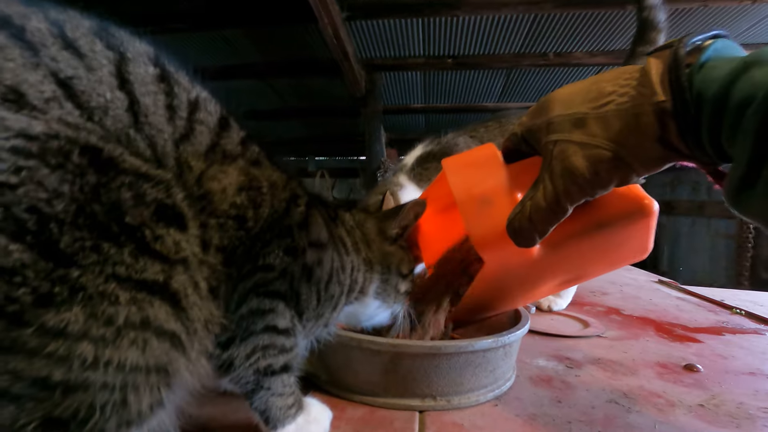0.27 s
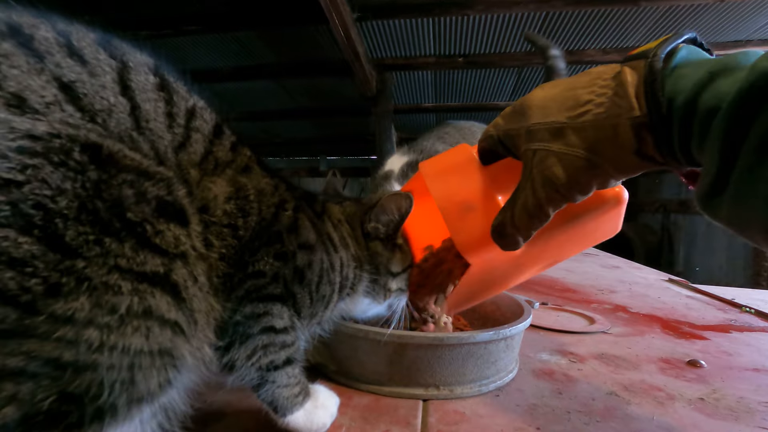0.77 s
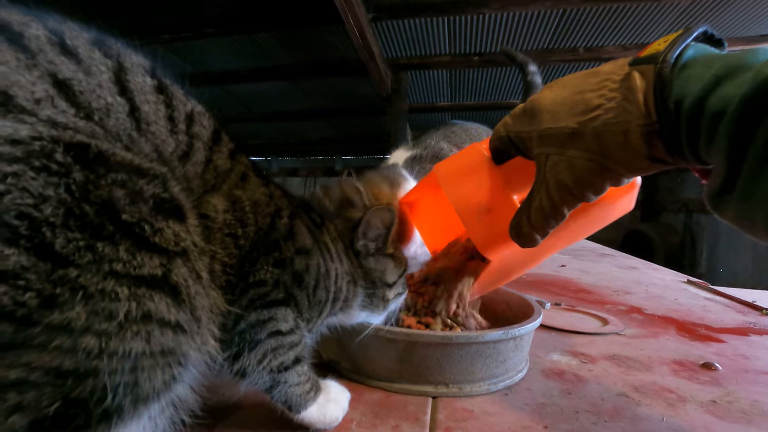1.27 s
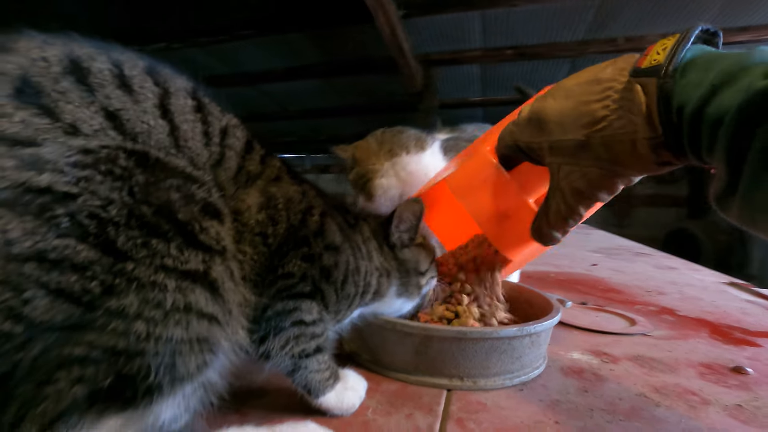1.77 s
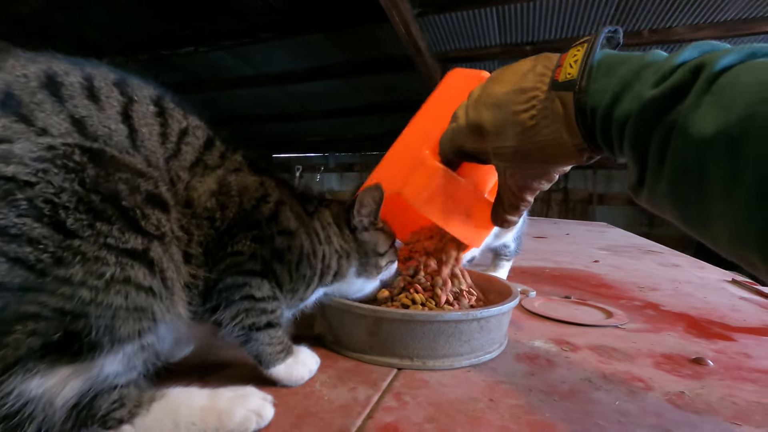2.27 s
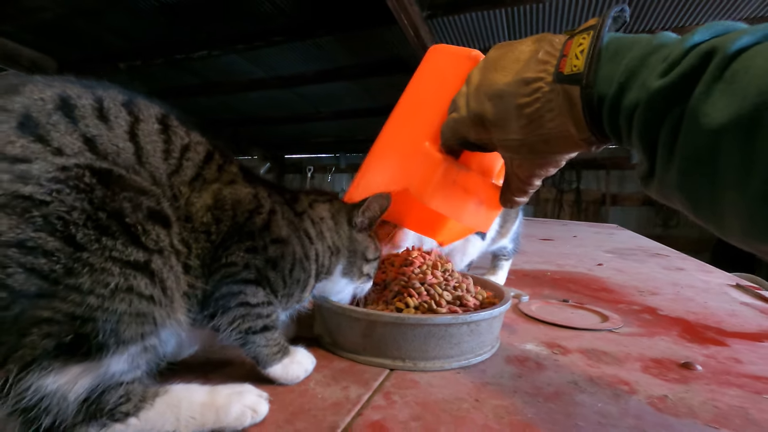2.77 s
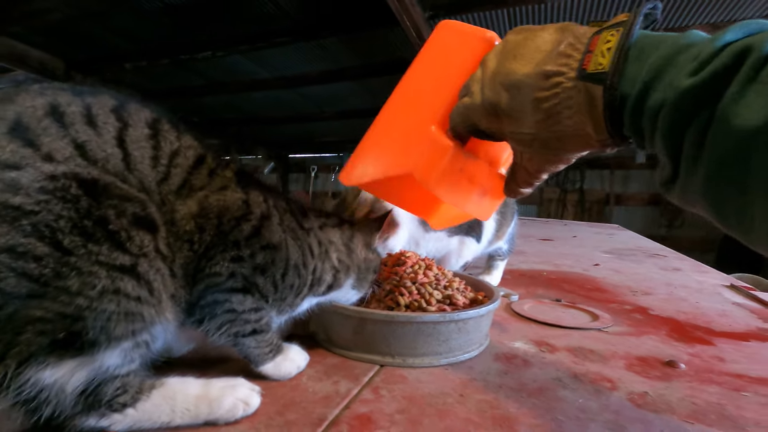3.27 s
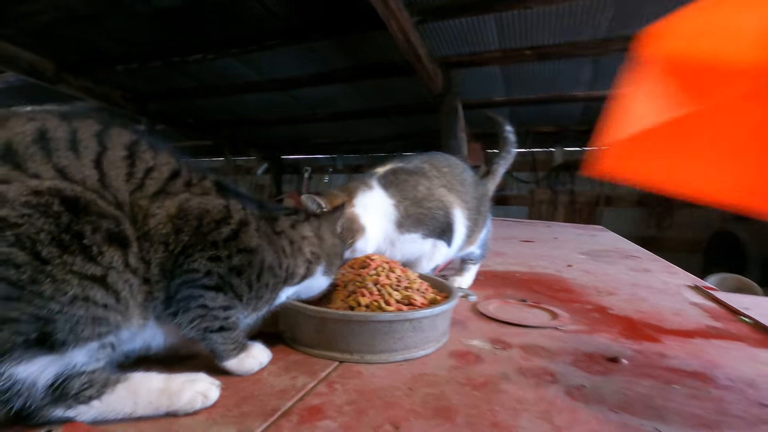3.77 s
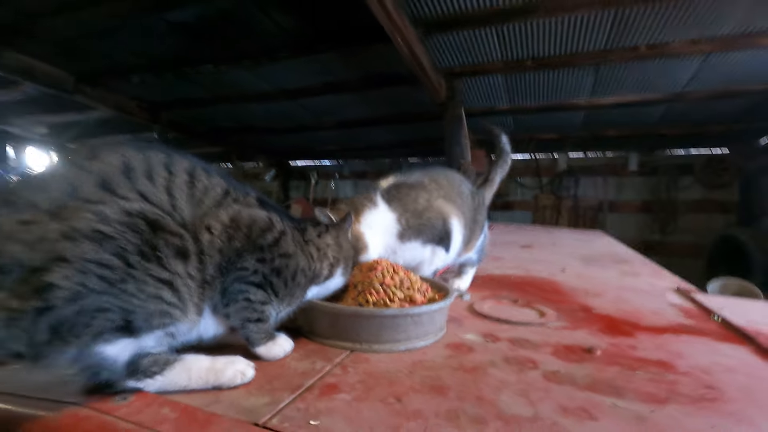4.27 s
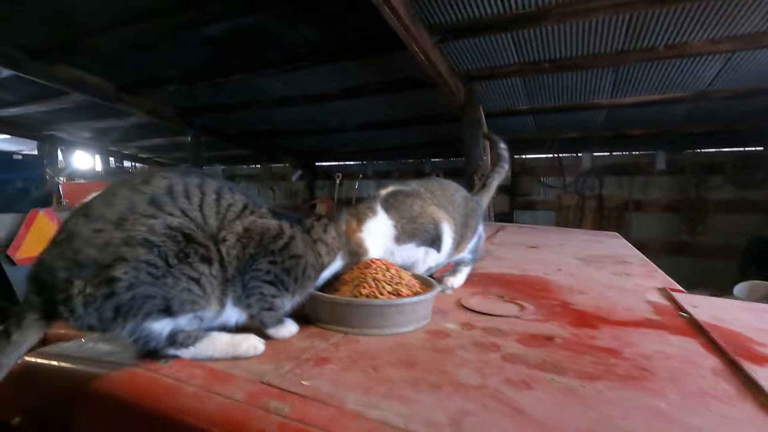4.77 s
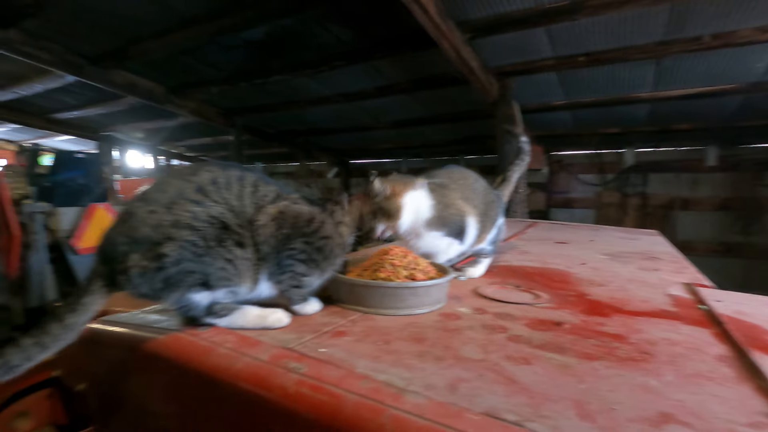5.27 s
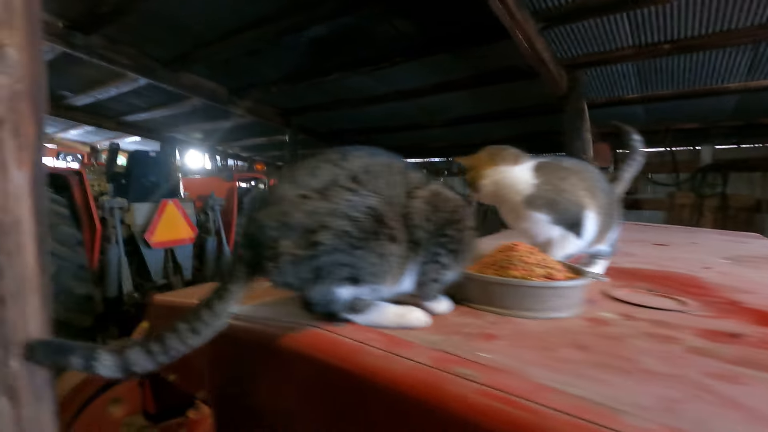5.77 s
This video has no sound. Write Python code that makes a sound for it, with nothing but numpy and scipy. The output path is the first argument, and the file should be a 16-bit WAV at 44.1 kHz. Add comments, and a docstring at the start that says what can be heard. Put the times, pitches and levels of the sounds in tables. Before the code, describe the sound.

Kibble pours in shaken surges into a ringing metal bowl for three seconds, then close cloth rustle and faint chewing ticks above a deep steady drone.

```python
"""In a barn with a low steady hum, dry cat food is shaken from a plastic scoop into a metal pan.
Crowds of tiny cracks make the kibble, which slides out in surges and drums on a deepening heap.
Single pieces ping resonances of the pan, whose modes change as it fills; others clack dryly.
Then a work jacket rustles close by in coloured slips and sliding resonances, and two cats nose and
crunch the food in soft knocks and ticks. Both ears get direct sound, reflections and the barn's air."""
import sys
import numpy as np
from scipy import signal
from scipy.fft import rfft, irfft, next_fast_len
from scipy.io import wavfile
from scipy.ndimage import map_coordinates

SR = 44100
rng = np.random.default_rng(int(sys.argv[2]) if len(sys.argv) > 2 else 0)


def generate_wav(signal):
    """Clip the signal to [-1, 1] and save it as 16-bit WAV at the path in sys.argv[1]."""
    frames = np.transpose(np.atleast_2d(signal))
    scaled = np.clip(frames, -1, 1) * 32767
    pcm = np.round(scaled).astype(np.int16)
    wavfile.write(sys.argv[1], SR, pcm)


N = 265658
TIME = np.arange(N) / SR

# All table levels are relative: the mix sets the final loudness.
# The steady stream out of the scoop: (time [s], rattle level [dB])
STREAM = [(0, -36.5), (.2, -36.5), (.55, -34), (.85, -39.5), (1.2, -40), (1.42, -48.5), (1.75, -41.5),
          (2.2, -41.5), (2.65, -40), (2.97, -53.5), (3.05, -63.5)]
# Surges let go by each shake of the scoop: (time of height [s], length [s], rattle level [dB])
SURGES = [(1.047, 0.047, -30), (1.096, 0.047, -31), (1.31, 0.068, -34.5), (1.47, 0.058, -42),
          (1.64, 0.062, -32.5), (1.802, 0.067, -32.5), (1.955, 0.055, -34), (2.06, 0.073, -37.5),
          (2.24, 0.037, -37.5), (2.395, 0.082, -32.5), (2.53, 0.094, -33), (2.69, 0.062, -35.5),
          (2.822, 0.043, -32), (2.937, 0.044, -39)]
# The heap drums more and deeper as it grows: (time [s], drumming level [dB], pitch [Hz])
HEAP = [(0, -15, 690), (.35, -5, 577), (1.1, 2, 516), (1.7, 0.5, 470), (2.35, 1.5, 470), (2.55, 2.5, 434),
        (2.85, 3, 476)]
# Hollow resonances under the falling kibble: (frequency [Hz], width [Hz], level [dB])
HOLLOW = [(298, 91, 0), (386.5, 28.4, 6), (446, 28, -6.5), (535, 17, 1.5), (612, 31, 1), (779, 15, -3.5)]
# Spectrum of the rattling kibble: (frequency [Hz], level [dB per Hz])
RATTLE = [(130, -1), (230, 4), (400, 0), (1050, -3), (1650, -7.5), (2500, -10.5), (3700, -11.5),
          (4700, -14), (6500, -24.5), (8500, -30), (12000, -33.5), (14500, -59)]
# Covered share of the pan's floor: (time [s], share [0-1])
COVERED = [(0, 0), (.8, .15), (1.35, .7), (1.6, 1)]
# Pieces that hit the pan: (time [s], ring level [dB], bright edge level [dB], favoured mode [Hz])
PINGS = [(.0024, -17.5, -23.5, 2130), (.059, -14.5, -32, 2175), (.065, -14.5, -21.5, 5600),
         (.093, -24, -32, 6600), (0.147, -25, -31, 5610), (0.199, -21, -35, 6440), (.2988, -23, -33, 6440),
         (.374, -13.5, -22, 8365), (.4383, -20.5, -28, 6440), (.509, -23.5, -27, 3170),
         (.571, -25, -33, 6440), (.652, -30, -28, 6440), (.8017, -20, -25.5, 7770),
         (1.1334, -27, -30, 11190), (1.208, -21.5, -27.5, 9410), (1.2333, -18, -29, 10010),
         (1.636, -19, -23, 7562), (1.7066, -29.5, -28.5, 7562), (1.9792, -28, -25.5, 9410),
         (2.07, -29, -32, 9410), (2.124, -43, -38, 9410), (2.257, -27, -33, 6540), (2.3208, -26, -34, 9410),
         (2.7896, -28, -30, 2200), (2.811, -23, -25.5, 5235), (2.8636, -26, -33, 5235),
         (2.898, -27.5, -30, 4160), (2.9504, -29, -35, 5235), (2.9779, -24.5, -47, 3125),
         (2.9867, -32, -37, 4200), (3.116, -35.5, -60, 1350), (3.163, -28, -44, 3840),
         (3.433, -29, -35.5, 3125)]
# Modes of the bare pan: (frequency [Hz], level [dB])
BARE_PAN = [(1020, 2), (2066, -3), (2183, -4), (3170, -5), (3810, -9), (4700, -5), (4800, -10), (5080, -12),
            (5610, -9.5), (6440, -5.5), (6600, -7), (7050, -8.5), (7420, -8), (7750, -3), (8170, -16),
            (8365, -5), (8660, -11), (9550, -13), (9800, -9), (10010, -11), (10130, -10), (10445, -5.5),
            (10950, -12), (11190, -8.5), (11530, -9.5), (12490, -12), (12830, -12)]
# Modes of the pan covered with kibble: (frequency [Hz], level [dB])
FULL_PAN = [(1350, 1), (1580, -2), (2105, -2), (2200, -0.5), (3125, 2), (3840, -9), (4160, -3.5),
            (5235, -4), (5970, -7), (6540, -6.5), (6890, -8), (7562, -8.5), (7750, -13), (9230, -16),
            (9410, -10), (10130, -12), (11020, -14), (11530, -11.5), (12470, -15)]
# Dry clacks of single pieces on the heap and the scoop: (time [s], peak level [dB], pitch [Hz])
CLACKS = [(.0443, -23, 2190), (.091, -21, 1300), (.2369, -25, 5110), (.273, -21.5, 626), (.3267, -23, 3230),
          (.3551, -20, 1500), (.4174, -21.5, 1390), (.4419, -23, 3190), (.4858, -29, 1550),
          (.5013, -24, 1690), (.513, -27, 3000), (.5886, -21, 1200), (.6394, -25, 1110), (.7098, -28, 2070),
          (.749, -23, 795), (.7637, -23, 3080), (.9113, -20.5, 3050), (.933, -22, 560),
          (1.0301, -21.5, 1700), (1.092, -16, 535), (1.106, -23, 2800), (1.1643, -25, 2060),
          (1.1763, -22, 865), (1.2716, -26, 1490), (1.579, -32, 580), (1.8058, -21, 2230),
          (1.962, -25, 534), (2.2284, -31, 1540), (2.2448, -23, 3130), (2.3441, -25, 3780),
          (2.3765, -20, 1670), (2.534, -19.5, 387), (2.578, -25, 1680), (2.6833, -25.5, 1690),
          (2.825, -19.5, 435), (2.929, -30, 604)]
# Short strokes of the jacket as the arm draws back:
# (time of height [s], length [s], rubbing level [dB], swish level [dB], pitch of the fold [Hz])
STROKES = [(3.056, 0.14, -56.5, -56, 280), (3.385, 0.055, -61, -63, 720), (3.61, 0.036, -53.5, -69, 500),
           (3.683, 0.025, -48, -51, 470), (3.763, 0.11, -47.5, -53.5, 310), (3.939, 0.055, -46, -48.5, 247),
           (4.021, 0.056, -47.5, -62, 280), (4.288, 0.036, -56.5, -65, 296), (4.39, 0.1, -52.5, -65, 260),
           (4.763, 0.092, -43.5, -57.5, 286), (4.858, 0.053, -49.5, -75, 374),
           (5.034, 0.094, -44, -68, 292), (5.784, 0.049, -69, -66, 500)]
# Cloth never quite at rest: (time [s], rubbing level [dB])
LIGHT_RUB = [(3.3, -66), (3.54, -62.5), (3.62, -59), (4.1, -56.5), (4.22, -62.5), (4.5, -65), (4.66, -57.5),
             (5.55, -63), (5.68, -70)]
# Spectrum of the rubbing cloth: (frequency [Hz], level [dB per Hz])
RUB = [(130, -5), (450, 1.5), (700, -1.5), (1050, -2), (1700, -13.5), (2600, -22.5), (5000, -30.5),
       (12000, -50)]
# Spectrum of the swishing strokes, also of the chewing: (frequency [Hz], level [dB per Hz])
SWISH = [(1000, 9.5), (2800, 2), (4200, 0.5), (6000, 0), (7500, 0.5), (8500, -7.5), (10500, -8),
         (12500, -16), (14500, -26)]
# Spectrum of the sleeve's swish in its long slide: (frequency [Hz], level [dB per Hz])
SLEEVE_SWISH = [(1200, 8), (3300, 0.5), (5200, 1), (7400, -5), (8500, -4), (10300, -4.5), (12500, -10),
                (14500, -22)]
# Narrow band of hiss near 7.4 kHz during the long slide, gliding down at first: (time [s], pitch [Hz])
HISS_PITCH = [(4.95, 8450), (5.08, 7400), (5.3, 7260), (5.5, 7450)]
# Soft crunches and nudges at the food: (time [s], peak level [dB], pitch [Hz])
CRUNCHES = [(3.663, -34.5, 554), (3.674, -31.5, 1640), (3.728, -37.5, 1730), (3.764, -37, 1090),
            (3.889, -34.5, 1030), (3.922, -34.5, 1010), (4.359, -39.5, 980), (4.41, -41.5, 880),
            (4.601, -43, 1900), (4.642, -45, 2080), (4.688, -43, 1590), (4.738, -34, 984),
            (5.041, -37, 950), (5.221, -34.5, 1080)]
# Faint high chirps and whiffs:
# (time of height [s], length [s], level [dB], pitch [Hz], relative bandwidth [factor])
SQUEAKS = [(3.656, 0.12, -53.5, 2700, 3.6), (4.572, 0.018, -61, 4960, 1)]
# Weight shifts on the metal deck: (time [s], level [dB], pitch [Hz])
THUDS = [(.003, -34, 146), (0.062, -37.5, 158), (3.944, -38, 150.7)]
# Partials of the hum: (multiple of its pitch [factor], rms level [dB])
HUM = [(1, -30.5), (2, -51.5), (4, -61)]
# Spectrum of the air in the barn: (frequency [Hz], level [dB per Hz])
BARN_AIR = [(26, -23.5), (45, -12), (66, -20.5), (86, -18), (118, -23.5), (279, -32.5), (347, -38),
            (730, -52.5), (1080, -54.5), (1300, -44), (1650, -48), (3310, -60.5), (6810, -64), (14000, -96)]

FALL_S = .0088  # surges reach the heap's drumming this much after the rattle
SWELL_SHAPE = 1.88  # how a surge or stroke rises and dies: 1 pointed, 2 bell-shaped
HEAP_WIDTH_HZ, HEAP_DB, HOLLOW_DB = 284, -7, -4
# the heap climbs the wall between these times and damps the ring (added width per Hz)
BURIED_S, BURIED_LOSS = (2.2, 3.1), .005
FAVOURED_DB = 6  # how far a ping's favoured mode stands out
CRACK_DB_PER_OCTAVE = 13.5  # up to 1600 Hz, higher-pitched pieces crack more than they ring
LIGHT_SWISH_DB = -3  # relative to the light rubbing
FOLDS_ABOVE_RUB_DB = -5
CATCH_DB, CATCHES_PER_S = 2.5, 45  # spread and rate of the cloth's catching and letting go
# one long slide of the sleeve, with a narrow band of hiss, during which its fold tightens
SLIDE_START_S, SLIDE_END_S, SLIDE_ATTACK_S, SLIDE_RELEASE_S = 4.89, 5.575, .38, .155
SLIDE_RUB_DB, SLIDE_SWISH_DB, SLIDE_FOLDS_DB, HISS_BAND_DB = -52, -52, -47, -57.5
SLIDE_FOLD_HZ, FOLD_RISE_HZ_PER_S = 315, 85
HISS_BAND_WIDTH_HZ, HISS_BAND_WANDER_HZ = 560, 130
HUM_HZ = 36.77
CUTOFF_HZ = 14500


def flow(delay_s):
    """Strength of the pour: a stream that stops when the scoop is empty, and the surges on top."""
    stream = from_db(in_time(STREAM)[0]) * (TIME < STREAM[-1][0])
    return np.sqrt(stream ** 2 + swells(SURGES, delay_s))


def kibble(pour, rattle_db, full_flow_db):
    """Pieces tumble on one another; their crowd drums on the scoop and on the deepening heap."""
    # a stronger flow has more contacts
    crowd = np.clip((pour / from_db(full_flow_db)) ** 1.6, .14, 1)
    contacts = grains(3200 * crowd, spread_db=3.5, t60=.008) / np.sqrt(crowd)
    rattle = from_db(rattle_db) * pour * colour(contacts, RATTLE)

    landings = grains(6000, spread_db=1.5, t60=.008)
    heap_db, heap_hz = in_time(HEAP)
    hollow = from_db(HOLLOW_DB) * body(landings, HOLLOW)
    heap = from_db(HEAP_DB) * moving_resonance(landings, heap_hz, HEAP_WIDTH_HZ)
    return rattle + from_db(heap_db) * flow(FALL_S) * (hollow + heap)


def pan(modes, share, pour, width_hz, patter_db, dull_hz, ring_db, edge_db):
    """Each piece strikes the pan at another spot, so each blow brings out other modes."""
    s, ring_level, edge_level, favoured_hz = np.transpose(PINGS)
    at = np.clip(np.round(s * SR).astype(int), 0, N - 1)
    buried = np.interp(TIME, BURIED_S, [0, 1])
    patter = rms_one(clicks(240, spread_db=1.3)) * from_db(patter_db) * pour
    out = np.zeros(N)
    for hz, db in modes:
        # the deck damps the low modes more
        width = width_hz * np.interp(hz, [2000, 5500], [2.2, 1])
        edge = np.interp(hz, [6000, 8000], [0, 1])
        level = (1 - edge) * (ring_level + ring_db) + edge * (edge_level + edge_db)
        level = level + FAVOURED_DB * np.exp(-(np.log(hz / favoured_hz) / .05) ** 2)

        # each grazing contact reaches a random part of the modes, the high ones less
        reached = rng.standard_normal(N) * (rng.random(N) < .4)
        blows = patter * reached / (1 + (hz / dull_hz) ** 3)
        strength = from_db(level + rng.normal(-1, 4.6, len(at)))
        blows[at] += strength * rng.choice([-1, 1], len(at))

        free = ring(blows * share * (1 - buried), hz, width)
        damped = ring(blows * share * buried, hz, width + BURIED_LOSS * hz)
        out += from_db(db) * (free + damped)
    # the shifting load of kibble bends the pitch of the modes a little
    return map_coordinates(out, [np.arange(N) + 1.3 * drift(45)], order=5)


def chinks(ring_db, edge_db, t60, rise_s):
    """Each ping opens with a crowd of quickly damped modes, building as the piece chatters on metal."""
    low, high = np.zeros((2, N))
    for s, ring_level, edge_level, _ in PINGS:
        chink = burst(t60)
        chink *= 1 - np.exp(-np.arange(len(chink)) / SR / rise_s)
        add(low, s, from_db(ring_level + ring_db) * chink)
        add(high, s, from_db(edge_level + edge_db) * chink)
    low_band = signal.butter(3, [1700, 5800], "band", fs=SR, output="sos")
    high_band = signal.butter(2, [5500, 11800], "band", fs=SR, output="sos")
    return signal.sosfilt(low_band, low) + signal.sosfilt(high_band, high)


def knocks(rows, level_db, t60, sharpness, crack_db, crack_low_hz, crack_top_hz):
    """Single dry blows: a crack and a short resonance around their pitch."""
    out = np.zeros(N)
    soften = signal.butter(2, [crack_low_hz, crack_top_hz], "band", fs=SR, output="sos")
    for s, db, hz in rows:
        crack = burst(t60)
        hardness = from_db(crack_db + CRACK_DB_PER_OCTAVE * min(np.log2(hz / 1600), 0))
        resonance = rms_one(ring(crack, hz, hz / sharpness))
        blow = resonance + hardness * rms_one(signal.sosfilt(soften, crack))
        add(out, s, from_db(db + level_db) * blow / np.abs(blow).max())
    return out


def jacket():
    """Stiff cloth rubs in tiny slips, its weave swishes, with a narrow hiss; its folds flutter hollowly."""
    strokes = np.array(STROKES)
    light = from_db(in_time(LIGHT_RUB)[0])
    rubbing = np.sqrt(swells(strokes[:, [0, 1, 2]], 0) + light ** 2)
    swishing = np.sqrt(swells(strokes[:, [0, 1, 3]], 0) + (from_db(LIGHT_SWISH_DB) * light) ** 2)
    slide_times = [SLIDE_START_S, SLIDE_START_S + SLIDE_ATTACK_S, SLIDE_END_S, SLIDE_END_S + SLIDE_RELEASE_S]
    slide = np.interp(TIME, slide_times, [0, 1, 1, 0])

    slips = grains(2600, spread_db=2.0, t60=.009) * from_db(CATCH_DB * drift(CATCHES_PER_S))
    weave = grains(7000, spread_db=.5, t60=.004)
    noise = rng.standard_normal(N)
    flutter = clicks(900, spread_db=1)

    rub = np.hypot(rubbing, from_db(SLIDE_RUB_DB) * slide) * colour(slips, RUB)
    swish = swishing * colour(weave + .5 * slips, SWISH)
    swish += from_db(SLIDE_SWISH_DB) * slide * colour(weave, SLEEVE_SWISH)
    hiss_hz = in_time(HISS_PITCH)[0] + HISS_BAND_WANDER_HZ * drift(22)
    hiss = from_db(HISS_BAND_DB) * slide * moving_resonance(noise, hiss_hz, HISS_BAND_WIDTH_HZ)

    fold_hz = in_time(STROKES)[-1]
    folds = from_db(FOLDS_ABOVE_RUB_DB) * rubbing * moving_resonance(flutter, fold_hz, width_hz=164)
    sleeve_hz = SLIDE_FOLD_HZ + FOLD_RISE_HZ_PER_S * np.maximum(TIME - SLIDE_START_S, 0)
    sleeve = from_db(SLIDE_FOLDS_DB) * slide * moving_resonance(flutter, sleeve_hz, width_hz=95)
    return rub + swish + hiss + folds + sleeve


def chewing(level_db):
    """Faint crisp ticks as the cats pick up and bite pieces."""
    eating = np.interp(TIME, [3.3, 3.8, 4.3, 5.3, 5.8], [.15, 1, .45, .13, .02])
    return from_db(level_db) * eating * colour(grains(70, spread_db=1.2, t60=.022), SWISH)


def squeaks(width_hz):
    """Faint, airy high chirps: noise through a resonance, swelling and dying."""
    out = np.zeros(N)
    for s, length, db, hz, relative_width in SQUEAKS:
        strength = np.sqrt(swells([(s, length, db)], 0))
        noise = rng.standard_normal(N)
        out += strength * moving_resonance(noise, np.full(N, hz), width_hz * relative_width)
    return out


def thuds(t60):
    """The sheet-metal deck booms softly as weight shifts on it."""
    out, t = np.zeros(N), np.arange(SR // 2) / SR
    swell = (1 - np.exp(-t / .014)) * np.exp(-np.log(1000) * t / t60)
    for s, db, hz in THUDS:
        add(out, s, from_db(db) * swell * np.sin(2 * np.pi * hz * t))
    return out


def barn(x, wet_db, t60, wall_hz):
    """Reflections from the metal deck and the roof: dying noise, different at each ear."""
    t = np.arange(SR // 2) / SR
    tails = rng.standard_normal((2, len(t))) * np.exp(-np.log(1000) * t / t60) * (t > .002)
    tails = signal.sosfilt(signal.butter(1, wall_hz, "high", fs=SR, output="sos"), tails)
    tails /= np.linalg.norm(tails, axis=1, keepdims=True)
    return from_db(wet_db) * signal.fftconvolve(x[None], tails, axes=1)[:, :N]


def hum():
    """A deep steady drone of a few harmonics that wavers slightly in phase."""
    phase = 2 * np.pi * HUM_HZ * TIME + .23 * drift(7.6)
    return np.sqrt(2) * sum(from_db(db) * np.cos(round(k) * phase) for k, db in HUM)


def barn_air(level_db):
    """Still air of the barn: coloured noise, partly shared by the two ears."""
    noise = rng.standard_normal(N) + .5 * rng.standard_normal((2, N))
    return from_db(level_db) * colour(noise, BARN_AIR)


def place(x, pan_db, lag_samples):
    """Sound reaches the left ear later; a positive pan_db makes it louder there, a negative softer."""
    turn = np.exp(-2j * np.pi * np.arange(N // 2 + 1) / N * lag_samples)
    late = irfft(rfft(x) * turn, N)
    return np.array([late * from_db(pan_db / 2), x * from_db(-pan_db / 2)])


def spread(x, side_db, corner_hz):
    """Contacts lean left or right by fast chance, mostly in the treble, opposite at the two ears."""
    side = signal.sosfilt(signal.butter(1, corner_hz, "high", fs=SR, output="sos"), x * drift(400))
    return from_db(side_db) * side * [[1], [-1]]


def grains(per_s, spread_db, t60, count=24):
    """Contacts dealt to many shapes of piece, from dull to bright, each with its own crack."""
    contacts = clicks(per_s, spread_db)
    shape = rng.integers(0, count, N)
    out = np.zeros(N)
    for k, hz in enumerate(np.geomspace(1200, 9000, count)):
        crack = burst(t60)[:int(t60 * SR)]
        crack = rms_one(crack) + rms_one(ring(crack, hz, .7 * hz))
        out += signal.oaconvolve(contacts * (shape == k), crack)[:N]
    return colour(out, [(4000, 0), (14000, 6)])


def clicks(per_s, spread_db):
    """Random contacts, many small and a few large."""
    sizes = from_db(spread_db * np.minimum(rng.exponential(1, N), 4))
    return (rng.random(N) < per_s / SR) * sizes * rng.choice([-1, 1], N)


def burst(t60):
    """The short dying crack of one contact; unit energy."""
    t = np.arange(SR // 8) / SR
    crack = rng.standard_normal(len(t)) * np.exp(-np.log(1000) * t / t60)
    return crack / np.linalg.norm(crack)


def body(x, modes):
    """Parallel resonances with the given relative top levels and alternating sign; rms 1."""
    out = np.zeros(N)
    for k, (hz, width, db) in enumerate(modes):
        out += (-1) ** k * from_db(db) * width * ring(x, hz, width)
    return rms_one(out)


def ring(x, hz, width):
    """A two-pole resonance: a unit click starts an oscillation that dies faster the wider it is."""
    r, w = np.exp(-np.pi * width / SR), 2 * np.pi * hz / SR
    return signal.lfilter([1, 0, -1], [1, -2 * r * np.cos(w), r * r], x + 1e-18) / 2


def moving_resonance(x, hz, width_hz):
    """A resonance whose pitch moves: shift down, smooth, shift back up; rms 1."""
    turn = np.exp(2j * np.pi * np.cumsum(hz) / SR)
    r = np.exp(-np.pi * width_hz / SR)
    smooth = signal.lfilter([1], [1, -2 * r, r * r], x / turn)
    return rms_one((smooth * turn).real)


def swells(rows, delay_s):
    """Summed power of events that rise and die around their time; length is taken at half power."""
    power = np.zeros(N)
    for s, length, db in rows:
        away = np.abs(2 * (TIME - s - delay_s) / length)
        power += from_db(db) ** 2 * .5 ** (away ** SWELL_SHAPE)
    return power


def colour(x, spectrum):
    """Causal (minimum-phase) filter with the given spectrum; rms 1."""
    size = 2 * next_fast_len(N // 2 + 4096)
    hz, db = np.transpose(spectrum)
    bins_hz = np.arange(size // 2 + 1) * SR / size
    log_gain = np.log(from_db(np.interp(np.log(bins_hz + 1), np.log(hz), db)))
    # folding the cepstrum onto positive times gives the minimum phase
    cepstrum = irfft(log_gain)[:size // 2]
    cepstrum[1:] *= 2
    return rms_one(irfft(rfft(x, size) * np.exp(rfft(cepstrum, size)))[..., :N])


def drift(rate):
    """Slow chance: normal random knots of spread one, rate per second, joined by lines."""
    knots = rng.standard_normal(int(N / SR * rate) + 2)
    return np.interp(TIME * rate, np.arange(len(knots)), knots)


def add(out, s, sound):
    """Mix a short sound in at a given time."""
    start = max(round(s * SR), 0)
    out[start:start + len(sound)] += sound[:N - start]


def in_time(rows):
    """Each column of a curve, sample by sample."""
    s, *columns = np.transpose(rows)
    return [np.interp(TIME, s, c) for c in columns]


def rms_one(x):
    """Scale to unit power."""
    return x / np.sqrt(np.mean(x ** 2) + 1e-20)


def from_db(db):
    """Decibels to gain."""
    return 10 ** (np.asarray(db) / 20)


def scene():
    """Pour, pan, cats and jacket over the hum and the air of the barn, as heard at two ears."""
    pour, covered = flow(0), in_time(COVERED)[0]
    food = kibble(pour, rattle_db=-1, full_flow_db=-32)
    food += pan(BARE_PAN, np.sqrt(1 - covered), pour, width_hz=26.2, patter_db=-24.5, dull_hz=5970,
                ring_db=-16.5, edge_db=-16.5)
    food += pan(FULL_PAN, np.sqrt(covered), pour, width_hz=15.9, patter_db=-30, dull_hz=5240,
                ring_db=-16, edge_db=-13)
    food += knocks(CLACKS, level_db=-2, t60=.032, sharpness=13.8, crack_db=7.5,
                   crack_low_hz=1780, crack_top_hz=4870)
    food += chinks(ring_db=14, edge_db=10.5, t60=.03, rise_s=.0018)

    crunches = knocks(CRUNCHES, level_db=1, t60=.045, sharpness=6, crack_db=-8,
                      crack_low_hz=700, crack_top_hz=3200)
    after = jacket() + crunches + chewing(level_db=-59) + thuds(t60=.39) + squeaks(width_hz=550)

    direct = place(food, pan_db=-1, lag_samples=.58) + place(after, pan_db=3.5, lag_samples=.72)
    width = spread(food + after, side_db=-5.5, corner_hz=3200)
    room = barn(food + after, wet_db=-17, t60=.2, wall_hz=500)
    background = barn_air(level_db=-48) + place(hum(), pan_db=.9, lag_samples=.82)
    return direct + width + room + background


def record(dry):
    """The microphone signal loses its top in a steep low-pass."""
    return signal.sosfilt(signal.ellip(10, .1, 80, CUTOFF_HZ, fs=SR, output="sos"), dry)


dry = scene()
out = record(dry)
generate_wav(out)
```